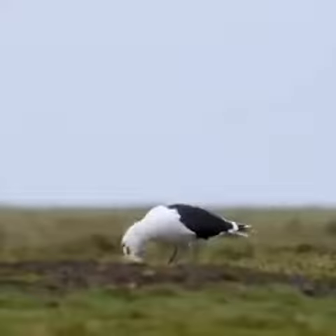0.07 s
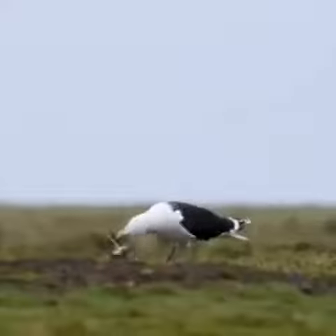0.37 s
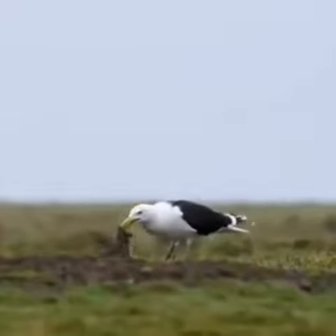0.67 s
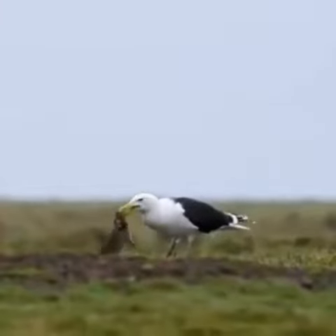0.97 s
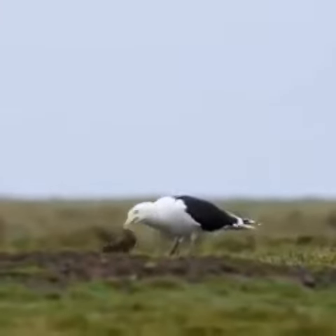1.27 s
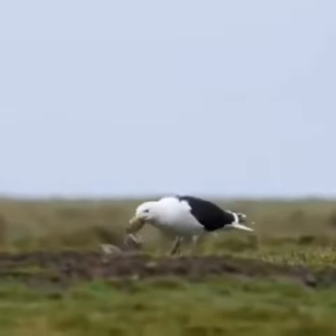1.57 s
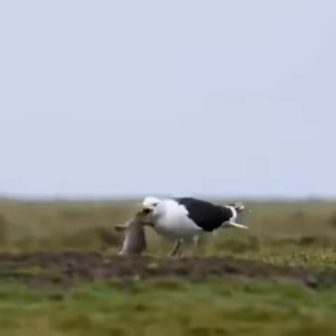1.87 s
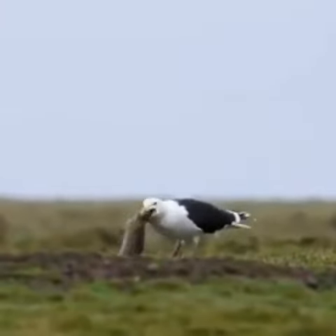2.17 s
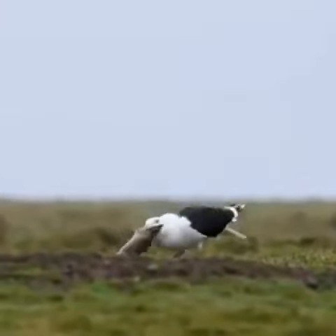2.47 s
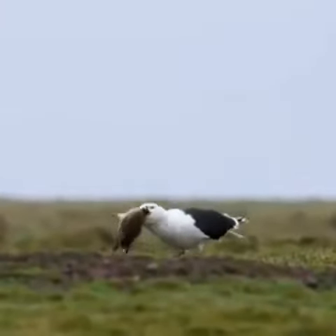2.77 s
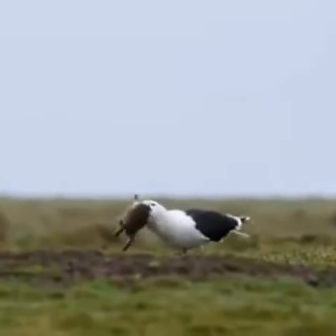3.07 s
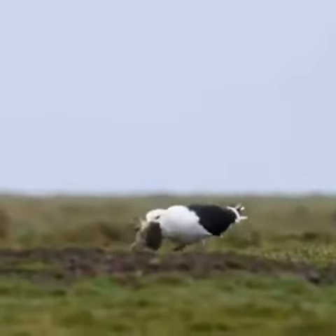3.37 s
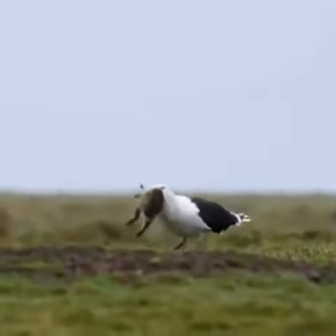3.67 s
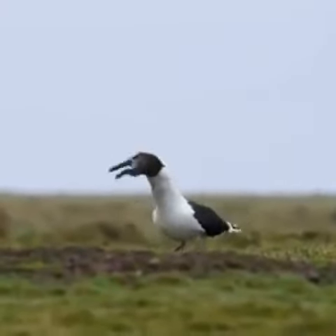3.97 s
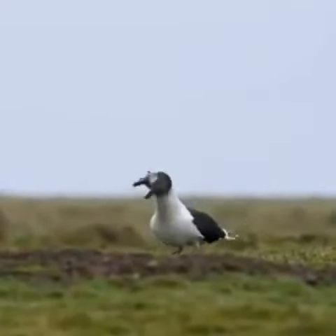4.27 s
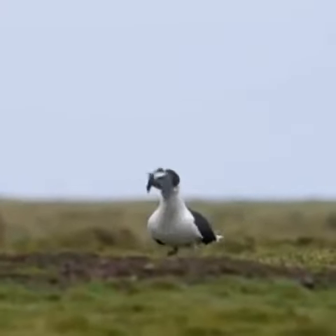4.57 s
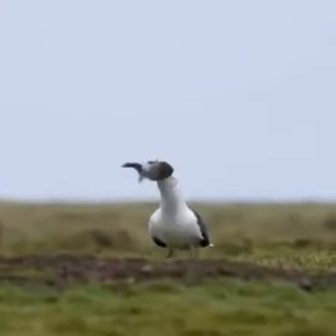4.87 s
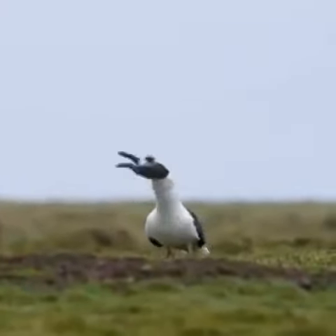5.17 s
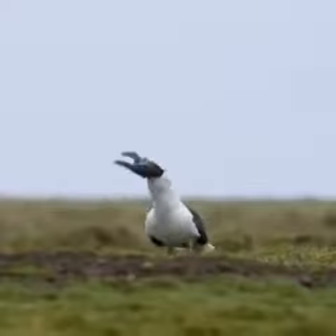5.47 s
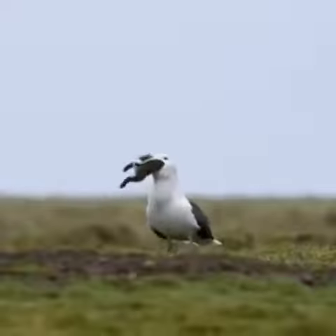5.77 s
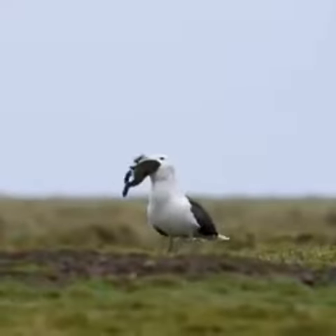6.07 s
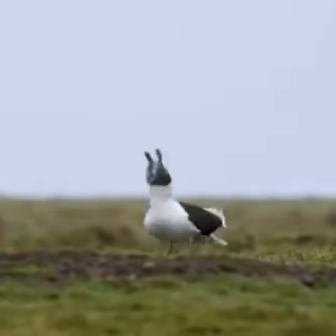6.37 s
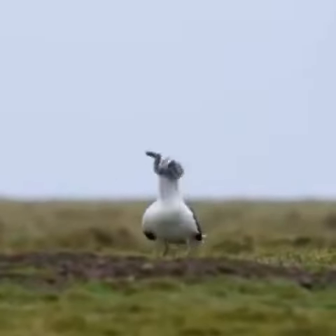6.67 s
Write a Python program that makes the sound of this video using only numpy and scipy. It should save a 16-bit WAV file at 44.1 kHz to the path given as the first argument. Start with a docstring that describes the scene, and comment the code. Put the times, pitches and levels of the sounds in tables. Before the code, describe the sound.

Wind rumbles and thumps on the microphone over open grassland while birds repeat short yelping calls and a gull squawks.

```python
"""Shore birds in a gusty wind

On open coastal grassland, gusts buffet the microphone in short puffs and thump when strong.
Two shore birds yap and yelp in long series, a gull's throat rings with harsh calls, a lark trills
and a small bird ends with a thin rising whistle. Far birds chatter; an opening hiss soon sinks away."""
import sys
import numpy as np
from scipy import signal
from scipy.fft import rfft, irfft, next_fast_len
from scipy.io import wavfile
from scipy.ndimage import uniform_filter1d

SR = 44100
rng = np.random.default_rng(int(sys.argv[2]) if len(sys.argv) > 2 else 0)


def persist_wave(psi):
    """Save psi, clipped to +-1, as 16-bit WAV."""
    counts = np.round(np.clip(psi, -1, 1) * 32767).astype(np.int16)
    wavfile.write(sys.argv[1], SR, np.atleast_2d(counts).T)


N = 305613
TIME = np.arange(N) / SR
START_S = .087  # the hiss and the wind begin here


def undb(db):
    """Turn decibels into a gain."""
    return 10 ** (np.asarray(db) / 20)


def unit(x):
    """Scale a sound to an average (rms) level of 1."""
    return x / np.sqrt(np.mean(x ** 2))


def noise(spectrum):
    """Noise whose tone follows (frequency [Hz], level [dB]) points."""
    hz, db = np.transpose(spectrum)
    n = next_fast_len(N, real=True)
    bins = np.maximum(np.fft.rfftfreq(n, 1 / SR), 1)
    gains = undb(np.interp(np.log(bins), np.log(hz), db))
    return unit(irfft(rfft(rng.standard_normal(n)) * gains, n)[:N])


def wobble(n, rate):
    """A smooth random wobble, about 1 in size, that turns `rate` times a second."""
    step = max(int(SR / rate), 1)
    return 1.473 * uniform_filter1d(np.repeat(rng.standard_normal(n // step + 1), step), step)[:n]


def resonate(x, hz, width_hz):
    """Let a sound ring at one frequency."""
    return signal.lfilter(*signal.iirpeak(hz, hz / width_hz, fs=SR), x)


def progress(length_s):
    """Run from 0 to 1 through a sound."""
    return np.linspace(0, 1, int(length_s * SR))


def phase_of(hz):
    """The phase of a gliding tone."""
    return 2 * np.pi * np.cumsum(hz) / SR


def swell_of(t, rise_s, fall_s):
    """A rounded swell that peaks at t = 0."""
    return np.exp(-(t / np.where(t < 0, rise_s, fall_s)) ** 2)


def add(out, start_s, sound):
    """Mix a sound in at a given time."""
    i = max(int(start_s * SR), 0)
    out[i:i + len(sound)] += sound[:max(N - i, 0)]


# The tone of the hiss: (frequency [Hz], relative level [dB])
HISS_TONE = [(100, 11.5), (300, 5.5), (700, -3), (1500, -7.5), (2200, -15), (3600, -14.5), (5000, -22.5),
             (8500, -20)]
def hiss(loud_db=-49, hold_until_s=.67, fall_db_per_s=150, bed_db=-83.5):
    """A broad hiss holds for a moment, then sinks to a faint bed."""
    sunk_db = fall_db_per_s * np.maximum(TIME - hold_until_s, 0)
    return noise(HISS_TONE) * (undb(loud_db - sunk_db) + undb(bed_db))


# The tone of the low hiss: (frequency [Hz], relative level [dB])
LOW_HISS_TONE = [(100, -29.5), (330, -11.5), (460, 2), (620, -14), (900, -30.5), (2000, -59.5)]
def low_hiss(level_db=-80.5):
    """A faint, steady band of noise near 460 Hz."""
    return undb(level_db) * noise(LOW_HISS_TONE)


# Groups of far birds: (start [s], end [s], pitch [Hz], pitch scatter scale [Hz], level [dB])
FAR_FLOCKS = [(.1, 2.38, 1630, 80, -69), (.1, 2.25, 1230, 150, -73.5), (2.38, 3.9, 1580, 60, -83),
              (4.98, 6.93, 1190, 60, -68), (5.15, 6.93, 1520, 80, -72), (.1, 6.93, 2210, 70, -72),
              (.1, 5.4, 3220, 90, -75), (1.7, 2.65, 3980, 110, -77), (3.6, 4.7, 3950, 220, -81),
              (5.3, 6.93, 3500, 550, -77), (5.95, 6.93, 5600, 500, -74)]
def far_chatter(calls_per_s=70, length_s=.045, glide=.04, quiver_hz=50, scatter_db=3, gain_db=-.5):
    """Many faint, quivering calls overlap into a blurred chatter."""
    out = np.zeros(N)
    u = progress(length_s) - .5
    for start, end, hz, spread_hz, db in FAR_FLOCKS:
        chatter = np.zeros(N)
        count = int((end - start) * calls_per_s)
        chance = rng.standard_normal((count, 3))
        for s, (detune, slope, size) in zip(np.linspace(start, end, count), chance):
            pitch = hz * (1 + glide * slope * u) + .8 * spread_hz * detune
            pitch += quiver_hz * wobble(len(u), 500)
            call = np.sin(phase_of(pitch)) * np.cos(np.pi * u)
            add(chatter, s - length_s / 2, undb(scatter_db * size) * call)
        out += undb(db + gain_db) * unit(chatter) * np.sqrt((end - start) / TIME[-1])
    return out


# Small birds' whistles: (start [s], length [s], first pitch [Hz], last pitch [Hz], level [dB])
WHISTLE_NOTES = [(.09, 0.175, 1540, 1490, -61), (.447, 0.146, 1483, 1170, -62.5),
                 (0.605, 0.1193, 1208, 1116, -59), (0.982, 0.1084, 1450, 1629, -62),
                 (1.333, 0.1176, 3746, 3281, -60), (3.473, 0.1725, 2115, 2026, -65.5),
                 (3.747, 0.0842, 2490, 2028, -61.5), (3.87, 0.439, 2949, 3176, -73.5),
                 (4.983, 0.381, 2923, 3010, -68.5), (5.318, 0.0736, 4780, 4513, -71.5),
                 (5.662, .075, 4480, 4287, -74), (5.739, 0.1016, 5090, 4680, -71),
                 (5.855, 0.088, 4460, 4295, -69.5), (6.107, .053, 4367, 4270, -69.5),
                 (6.192, .035, 5560, 5080, -64.5), (6.293, 0.1415, 4960, 4204, -63.5),
                 (6.407, 0.045, 5850, 5000, -57), (6.537, 0.1685, 7110, 7743, -54.5),
                 (6.543, 0.1013, 4800, 4208, -64.5), (6.775, 0.0559, 5950, 5065, -50)]
def small_bird_whistles(jitter_hz=40, shimmer=.34, settle=2.2):
    """Nearly pure tones glide fast at first, settle on their last pitch and quiver a little."""
    out = np.zeros(N)
    for s, length, first, last, db in WHISTLE_NOTES:
        u = progress(length)
        pitch = last + (first - last) * (1 - u) ** settle + jitter_hz * wobble(len(u), 500)
        swell = signal.windows.tukey(len(u), .65) * (1 + shimmer * wobble(len(u), 150))
        add(out, s, undb(db) * unit(np.sin(phase_of(pitch)) * swell))
    return out


# The lark opens with one short falling chip, repeated: (start [s], relative level [dB])
LARK_CHIPS = [(.421, -66), (.63, -64), (.849, -68.5), (1.278, -63.5)]
CHIP_S, CHIP_FROM_HZ, CHIP_TO_HZ, CHIP_TRILLS_PER_S, CHIP_WARBLE_HZ = .047, 5000, 3675, 180, 250
# Its buzzy notes: (start [s], length [s], first pitch [Hz], last pitch [Hz], relative level [dB],
# trill rate [1/s], warble scale [Hz])
LARK_NOTES = [(1.482, 0.1304, 3372, 3013, -60.5, 69.6, 300), (1.62, 0.182, 4615, 3913, -64.5, 73.7, 206),
              (1.766, 0.1427, 3967, 3819, -63.5, 115, 100), (2.238, .22, 4065, 4228, -67, 80, 379),
              (2.468, 0.1576, 5096, 3875, -62, 233, 210), (2.855, 0.194, 4960, 4638, -62.5, 114, 228),
              (2.95, 0.1894, 4348, 3832, -60, 110, 450), (3.206, 0.201, 3940, 4392, -67, 70, 560),
              (3.419, 0.186, 3387, 3547, -60, 103, 419), (3.626, .08, 4370, 4253, -75.5, 60, 169),
              (3.757, 0.191, 4119, 4008, -65.5, 42, 120), (4.051, 0.062, 4170, 3756, -72.5, 90, 305.5),
              (4.169, 0.1307, 3158, 3110, -65.5, 39.2, 226), (4.275, 0.34, 4312, 3854, -69, 48, 260),
              (5.115, 0.177, 3753, 3590, -68.5, 55, 290), (6.503, 0.0685, 6813, 6283, -61, 90.5, 383)]
def lark_trills(uneven=.088, rasp=.38, pulsing=.41, blur_s=.0186, blur_db=-5):
    """The pitch warbles up fast and down slowly, never quite evenly; gusty air blurs the pulses."""
    out = np.zeros(N)
    chips = [(s, CHIP_S, CHIP_FROM_HZ, CHIP_TO_HZ, db, CHIP_TRILLS_PER_S, CHIP_WARBLE_HZ)
             for s, db in LARK_CHIPS]
    for s, length, first, last, db, rate, depth in chips + LARK_NOTES:
        u = progress(length)
        beat = phase_of(rate * (1 + uneven * wobble(len(u), 80)))
        warble = np.sin(beat) + np.sin(2 * beat) / 4
        pitch = first + (last - first) * u + depth * (.64 * warble + rasp * wobble(len(u), 700))
        pulses = (1 - pulsing * np.cos(beat)) * (1 + .028 * wobble(len(u), 120))
        swell = signal.windows.tukey(len(u), .6)
        add(out, s, undb(db) * unit(np.sin(phase_of(pitch)) * pulses * swell))
    air_paths = rng.standard_normal(int(blur_s * SR)) * (1 - progress(blur_s))
    blurred = signal.fftconvolve(out, air_paths / np.linalg.norm(air_paths))[:N]
    return .759 * (out + undb(blur_db) * blurred)


# Where the gull's throat rings: (frequency [Hz], width of each filter [Hz], relative level [dB])
GULL_THROAT = [(1264, 950, 5), (2561, 620, 11.5), (3020, 990, 12), (4060, 550, -8)]
# Harsh gull calls: (start [s], length [s], pitch [Hz], level [dB], roughness [0-1])
GULL_CALLS = [(3.779, 0.1087, 508.6, -65.5, 0.56), (5.511, 0.106, 559.2, -70, 0.61),
              (5.716, 0.1584, 544, -62.5, 0.48), (5.947, 0.1598, 560.5, -58, 0.57),
              (6.191, .18, 560.5, -54, .58), (6.449, .17, 546.2, -57, 0.52),
              (6.696, 0.2016, 568, -61.5, 0.64)]
def gull_squawks(fall=.15, jitter=.042, shimmer=.49, top_hz=4300):
    """Uneven pulses and rasping air ring the gull's throat; each call swells and sinks."""
    out = np.zeros(N)
    for s, length, hz, db, rough in GULL_CALLS:
        u = progress(length)
        phase = phase_of(hz * (1 - fall * (u - .5) + jitter * rough * wobble(len(u), 500)))
        pulses = sum(np.cos(k * phase + rng.uniform(0, 2 * np.pi))
                     * (1 + shimmer * wobble(len(u), 70.64)) for k in range(2, 9))
        breath = rng.standard_normal(len(u)) * (1 + np.cos(phase))
        source = (unit(pulses) + 1.1 * rough * breath) * (1 + .3 * rough * wobble(len(u), 300))
        voice = sum(undb(ring_db) * resonate(resonate(source, ring_hz, width), ring_hz, width)
                    for ring_hz, width, ring_db in GULL_THROAT)
        voice = signal.sosfilt(signal.butter(4, top_hz, fs=SR, output="sos"), voice)
        add(out, s, undb(db) * unit(voice * np.sin(np.pi * u)))
    return out


# One shore bird's lower yelps: (middle [s], pitch [Hz], level [dB])
YELP_CALLS = [(3.986, 1178, -79.5), (4.233, 1250, -69.5), (4.5, 1218, -76.5), (4.766, 1219, -56),
              (5.015, 1256, -48.5), (5.274, 1243, -48.5), (5.539, 1242, -48), (5.804, 1195, -51),
              (6.085, 1165, -53.5), (6.399, 1166, -54), (6.714, 1136, -59.5)]
def shore_bird_yelps(length_s=.085, fall=.24, arch=.16, slowing=.23, jitter=.028, rough=.26):
    """Hollow, slightly hoarse falling calls grow longer and flatter as the series goes on."""
    out = np.zeros(N)
    series_middle_s = np.mean(YELP_CALLS, axis=0)[0]
    for s, hz, db in YELP_CALLS:
        stretch = np.exp(slowing * (s - series_middle_s))
        u = progress(length_s * stretch) - .5
        phase = phase_of(hz * (1 - fall / stretch * u - arch * u ** 2 + jitter * wobble(len(u), 300)))
        voice = np.sin(phase) + undb(-24) * (np.sin(2 * phase) + .5 * np.sin(3 * phase))
        swell = np.cos(np.pi * u) * (1 + rough * wobble(len(u), 200))
        add(out, s - len(u) / SR / 2, np.sqrt(2) * undb(db) * voice * swell)
    return out


# High yaps, most from one shore bird and a few from the yelping one: (middle [s], pitch [Hz], level [dB],
# hoarseness [0 = clear])
YAP_CALLS = [(.318, 1095, -69, 0.17), (.547, 1123, -56.5, 0.16), (.751, 1112, -62.5, 1.11),
             (.823, 1122, -55, 0.31), (.961, 1110, -67.5, 0.18), (1.125, 1119, -52, 0.24),
             (1.19, 1114, -65.5, 0.01), (1.411, 1121, -53.5, 0.09), (1.712, 1109, -55, 0.06),
             (2.006, 1105, -57, 0.21), (2.31, 1098, -55.5, 0.03), (2.615, 1099, -55, 0),
             (2.912, 1095, -55.5, 0.33), (3.215, 1101, -56.5, 0.02), (3.528, 1104, -60, 0),
             (5.33, 1196, -51.5, 0), (5.776, 1184, -54.5, 0)]
def shore_bird_yaps(length_s=.082, fall=.105, droop=.07, full_db=-60, throat_hz=1132.7, gain_db=.88):
    """Short falling calls; in hoarse ones every other vibration differs, adding in-between tones."""
    out = np.zeros(N)
    for s, hz, db, hoarse in YAP_CALLS:
        # the second harmonic fades in soft yaps and in those pitched above the throat's resonance
        second_db = -1 - 2.5 * max(full_db - db, 0) - .07 * max(hz - throat_hz, 0)
        u = progress(length_s) - .5
        phase = phase_of(hz * (1 - fall * u - droop * u ** 2 + .003 * wobble(len(u), 300)))
        voice = undb(-32) * np.sin(phase) + undb(second_db) * np.sin(2 * phase) + np.sin(3 * phase)
        between = sum(undb(tone_db) * np.sin(ratio * phase)
                      for ratio, tone_db in [(1.5, 1), (2.5, -20.5), (3.5, -8.5), (4.5, -20)])
        voice += hoarse * between * (1 + .5 * wobble(len(u), 250))
        swell = np.cos(np.pi * u).clip(0) ** .9
        add(out, s - length_s / 2, np.sqrt(2) * undb(db + gain_db) * voice * swell)
    return out


def field_echo(calls, delay_s=.0032, fade_s=.34, dull_hz=2220, gain_db=-14):
    """Turf and swirling air scatter a faint, dull tail behind every call."""
    t = progress(fade_s)
    tail = rng.standard_normal(len(t)) * undb(-60 * t / fade_s) * (t > delay_s)
    tail = signal.lfilter(*signal.butter(1, dull_hz, fs=SR), tail / np.linalg.norm(tail))
    return calls + undb(gain_db) * signal.fftconvolve(calls, tail)[:N]


# Gusts that swell and die away: (peak time [s], level [dB], rise [s], fall [s])
WIND_GUSTS = [(1.73, -28.5, 0.263, 0.291), (2.45, -30, 0.0197, 0.0956), (3.22, -32, 0.1902, .56),
              (4.6, -43, 0.176, 0.061), (5.271, -29, 0.0155, 0.1119), (5.8, -21.5, 0.0257, 0.1153),
              (6.13, -38.5, .2, 0.317)]
# The strongest short puffs: (time [s], level [dB])
STRONG_PUFFS = [(.412, -37), (.535, -37.5), (.68, -38.5), (0.991, -35), (1.14, -31), (1.306, -38),
                (1.429, -28.5), (1.519, -25.5), (1.571, -20), (1.665, -22.5), (1.71, -23), (1.777, -26.5),
                (2.048, -31), (2.455, -29.5), (2.877, -35), (3.08, -26.5), (3.151, -26.5), (3.251, -23),
                (3.342, -23.5), (3.497, -33), (3.647, -28), (3.786, -33.5), (3.94, -33.5), (4.153, -37),
                (4.261, -38), (4.627, -35.5), (4.806, -39), (5.27, -22.5), (5.872, -25), (6.016, -23.5),
                (6.125, -32), (6.269, -33), (6.612, -35.5), (6.788, -36.5), (6.899, -33)]
def wind_power(breeze_db=-57.5, lump_db=2.1, puff_s=.00788, puffs_per_s=12, weak_db=-46, scatter_db=2.5):
    """A steady breeze, lumpy gusts, strong puffs and weak random ones add up at the microphone."""
    gusts = sum((undb(db) * swell_of(TIME - s, rise, fall)) ** 2 for s, db, rise, fall in WIND_GUSTS)
    power = undb(breeze_db) ** 2 + gusts * undb(lump_db * wobble(N, 30)) ** 2
    weak_puffs = [((k + .263 * shift) / puffs_per_s, weak_db + scatter_db * size)
                  for k, (shift, size) in enumerate(rng.standard_normal((120, 2)))]
    t = (progress(puff_s * 10) - .5) * puff_s * 10
    for s, db in STRONG_PUFFS + weak_puffs:
        add(power, s + t[0], undb(db) ** 2 * np.exp(-.5 * (t / puff_s) ** 2))
    return power


# Bands of swirling air: (frequency [Hz], level in a moderate wind [dB], growth [dB per dB of wind])
SWIRL_BANDS = [(30.1, -59.5, 0.2), (48.3, -51.5, 0.285), (69.4, -43.5, .5), (100.99, -41.5, 0.5225),
               (143.74, -41.5, 0.8432), (196.5, -43, 1.29), (281.03, -52, 1.8214), (387, -62, 1.94),
               (522.5, -73, 2), (716, -94.5, 0.39)]
def wind_buffeting(moderate_db=-35, band_ratio=1.3974, flutter_db=2.5, knee_db=4, easing=.317):
    """Stronger wind makes smaller swirls, so the higher bands mostly gain more than the deep rumble."""
    strength_db = 10 * np.log10(wind_power()) - moderate_db
    strength_db -= easing * np.maximum(strength_db - knee_db, 0)  # the hardest blows level off
    out = np.zeros(N)
    for hz, db, growth in SWIRL_BANDS:
        band = noise([(hz / band_ratio ** 2, -60), (hz / band_ratio, -9), (hz, 0),
                      (hz * band_ratio, -19), (hz * band_ratio ** 2, -60), (hz * 10, -120)])
        band /= np.sqrt(uniform_filter1d(band ** 2, int(4 / hz * SR)) + 1e-12)  # even out slow swells
        out += band * undb(db + growth * strength_db + flutter_db * wobble(N, 60))
    return out * swell_of(TIME - START_S, rise_s=.0034, fall_s=np.inf)


# Strong swirls that slap the microphone: (time [s], peak level [dB])
WIND_SLAPS = [(1.711, -23.5), (3.343, -31.5), (5.7988, -15.5), (5.803, -21), (5.809, -21)]
def wind_slaps(width_s=.0005404):
    """Each swirl is one pressure peak between two shallow dips."""
    out = np.zeros(N)
    t = (progress(.01) - .5) * .01
    pulse = (1 - (t / width_s) ** 2) * np.exp(-.5 * (t / width_s) ** 2)
    for s, db in WIND_SLAPS:
        add(out, s + t[0], undb(db) * pulse)
    return out


def scene():
    """Birds out in the field, wind right at the microphone."""
    calls = shore_bird_yaps() + shore_bird_yelps() + gull_squawks()
    birds = field_echo(calls + small_bird_whistles() + lark_trills() + far_chatter())
    hisses = (hiss() + low_hiss()) * swell_of(TIME - START_S, rise_s=.00265, fall_s=np.inf)
    return (hisses + birds + wind_buffeting() + wind_slaps())[None]


def record(dry):
    """Cut the treble above 8650 Hz."""
    return signal.sosfilt(signal.ellip(8, .2, 70, 8650, fs=SR, output="sos"), dry)


dry = scene()
out = record(dry)
persist_wave(out)
```